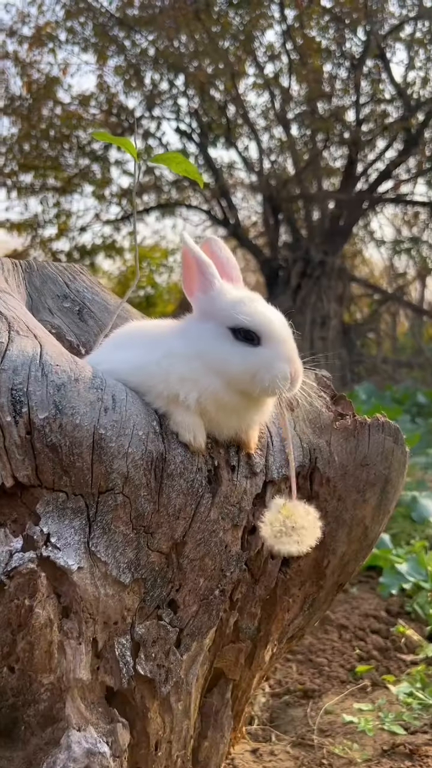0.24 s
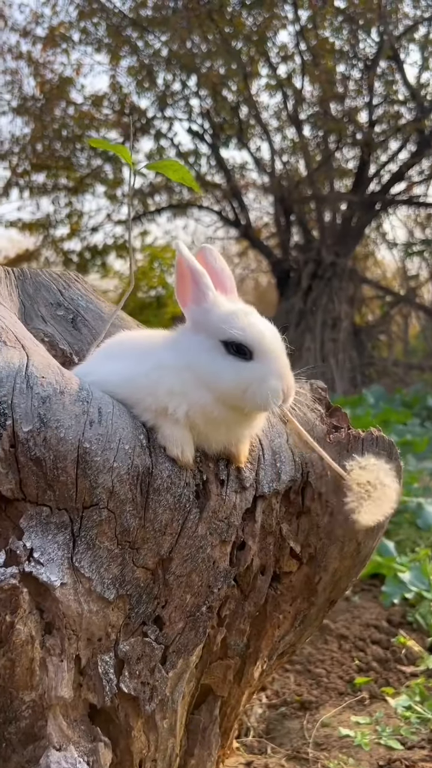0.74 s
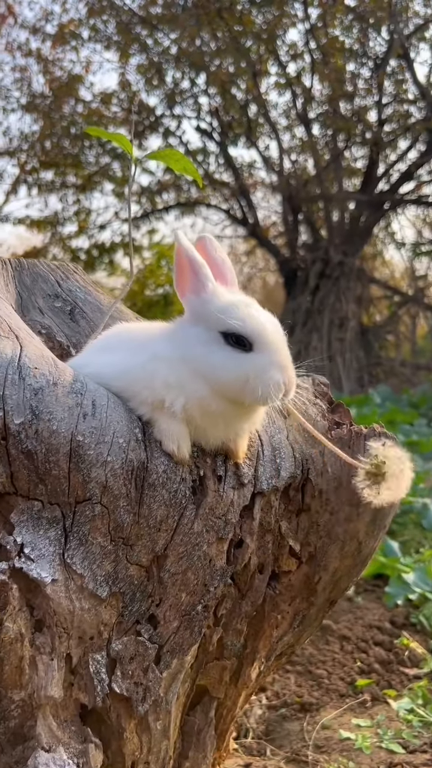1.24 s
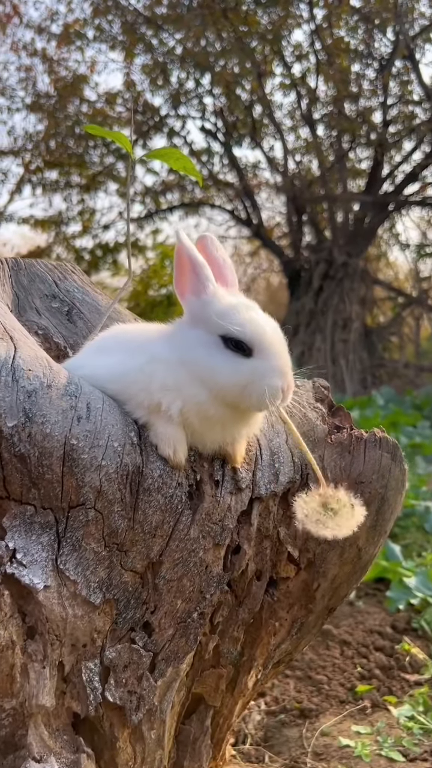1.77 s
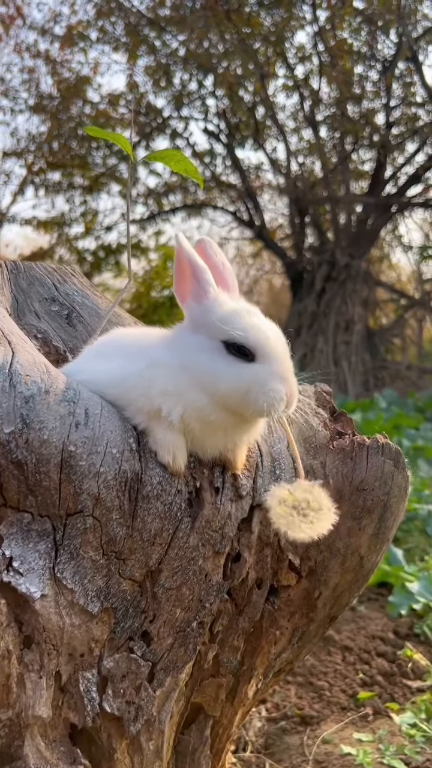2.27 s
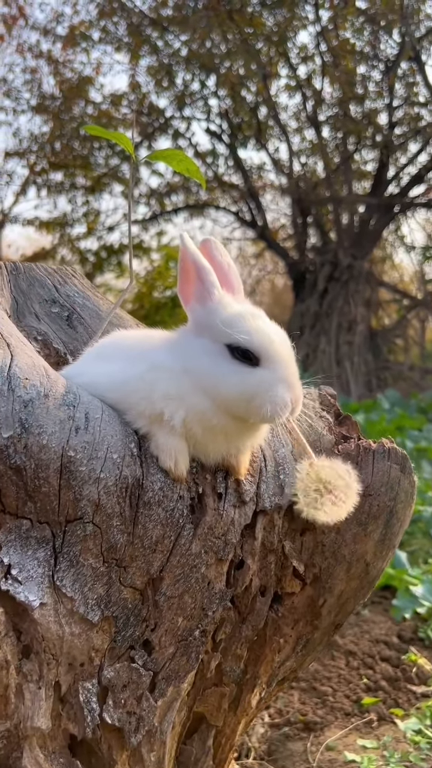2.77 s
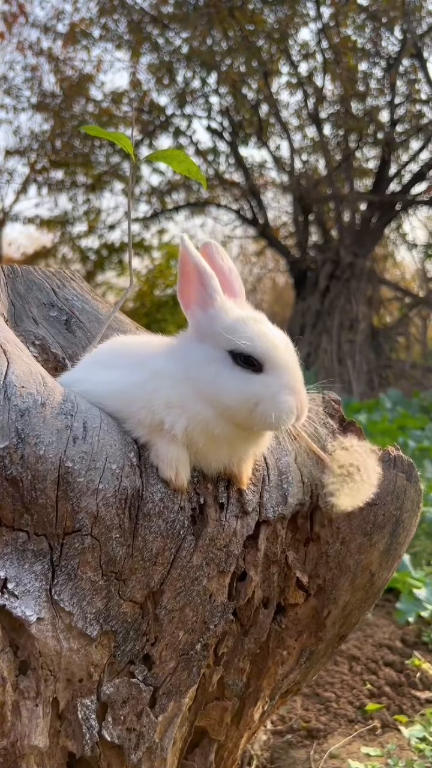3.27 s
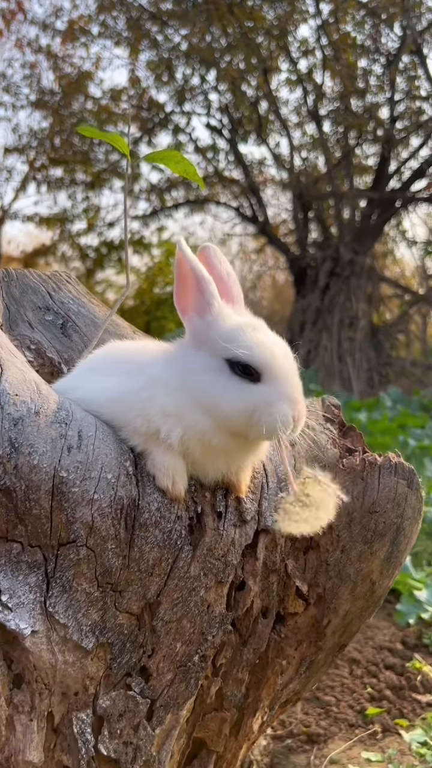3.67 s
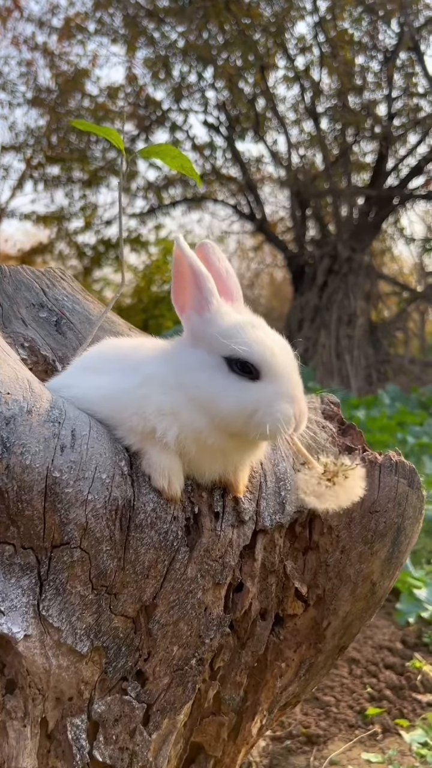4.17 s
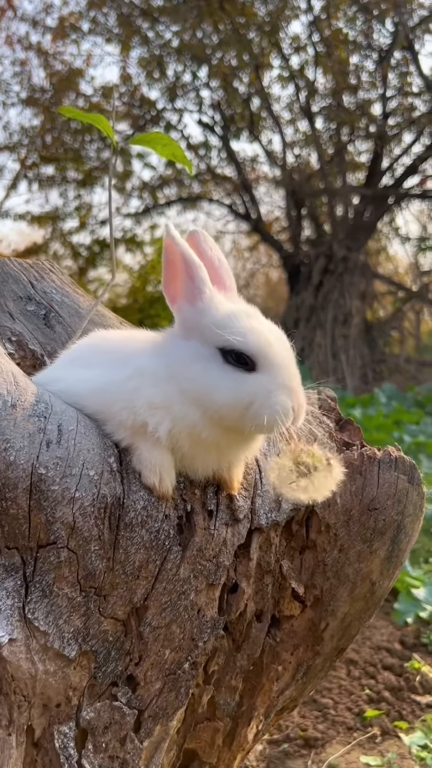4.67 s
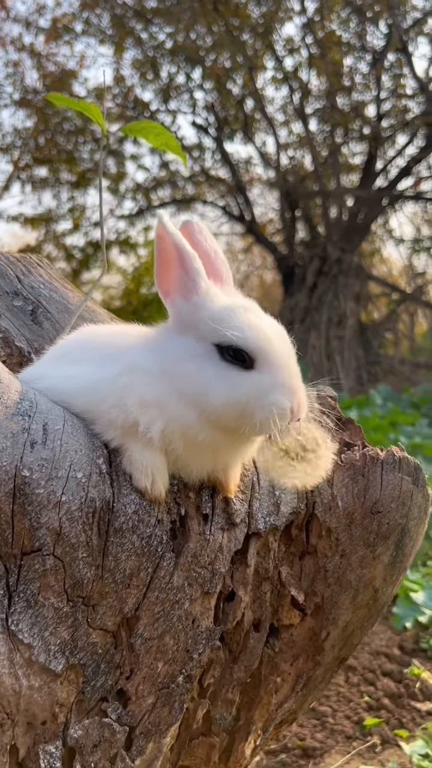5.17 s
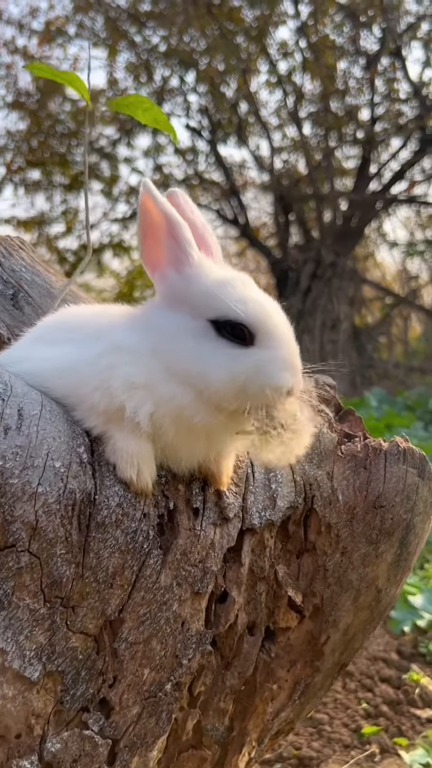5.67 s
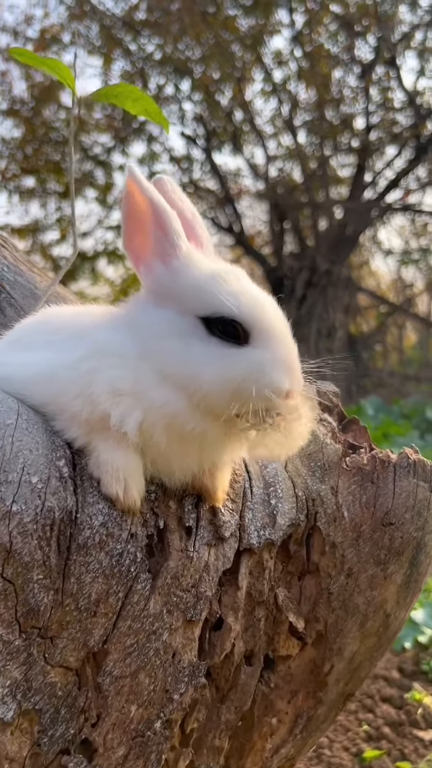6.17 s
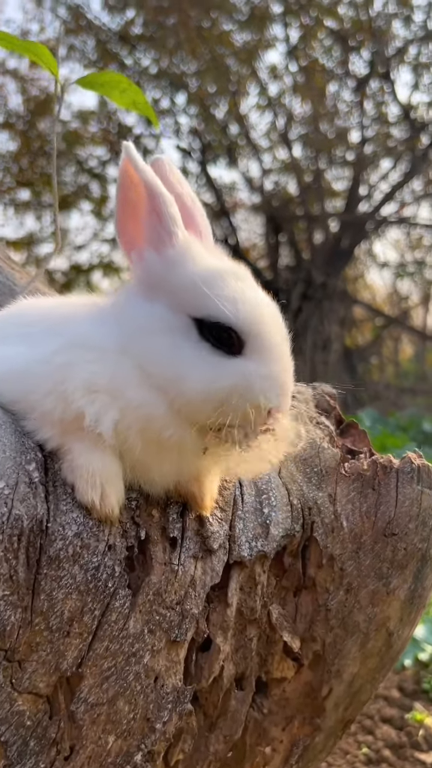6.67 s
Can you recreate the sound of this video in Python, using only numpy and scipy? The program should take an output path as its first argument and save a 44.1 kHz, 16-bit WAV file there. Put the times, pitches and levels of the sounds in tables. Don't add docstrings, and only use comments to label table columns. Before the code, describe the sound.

A small rabbit munches a dry stalk close up, crackling and snapping rapidly, while distant engines hum low underneath and one nears last.

```python
import sys
import numpy as np
from scipy import signal
from scipy.fft import rfft, irfft, next_fast_len
from scipy.io import wavfile
from scipy.ndimage import uniform_filter1d

SR = 44100
rng = np.random.default_rng(int(sys.argv[2]) if len(sys.argv) > 2 else 0)


def int16_out(signal):
    q = np.round(np.clip(np.atleast_2d(signal).T, -1, 1) * 32767)
    wavfile.write(sys.argv[1], SR, q.astype(np.int16))


def invert_db(level):
    return 10 ** (np.asarray(level, dtype=float) / 20)


N = 305362
SIZE = next_fast_len(N + 4096)
HZ = np.fft.rfftfreq(SIZE, 1 / SR)
TIME = np.arange(N) / SR

# [t/s, drone f/Hz, drone level/dB, roar level/dB]
TRAFFIC = [(0.0, 54, -43, -40), (0.25, 61.03, -31.5, -35), (0.6, 66.7, -32.5, -41.5),
           (0.85, 67.53, -31, -37.5), (1.5, 63.9, -35.5, -43.5), (1.73, 67.6, -31.5, -41.5),
           (2.75, 67.87, -39.5, -39.5), (3.12, 61.6, -36, -48.5), (3.7, 68.7, -37, -41),
           (3.91, 59.54, -40.5, -47.5), (4.35, 66.44, -34.5, -45), (4.59, 56.34, -24.5, -35.5),
           (5.01, 58.34, -31, -45.5), (5.389, 62.1, -42.5, -47), (5.82, 66.72, -27.5, -44.5),
           (6.15, 64.57, -33, -50.5), (6.4, 70.6, -28, -44.5), (6.92, 71.3, -15.5, -37.5)]
# [f/Hz, level/dB per Hz]
ROAR_COLOUR = [(15, -44), (25, 0), (49, -5.5), (76, 0.5), (151, -11.5), (200, -11.5), (395, -25),
               (700, -34.5), (910, -34), (1540, -120)]
# [f/Hz, likeness 0 to 1]
ROAR_LIKENESS = [(60, 1), (140, 0.98), (210, 0.91), (330, 0.35), (500, 0.059)]
# [f/Hz, level/dB per Hz]
SUM_COLOUR = [(150, -24), (400, -16.5), (1400, -10.5), (2200, -14.5), (3400, -11), (4700, -9), (5900, -15),
              (9300, -17), (10000, -8.5), (11500, -10.5), (14600, -19), (15700, -22.5), (16500, -65)]
# [f/Hz, level/dB per Hz]
DIFFERENCE_COLOUR = [(250, -29), (700, -14), (1800, -24), (2900, -17), (3800, -22), (5600, -1), (7100, -2),
                     (9300, -1), (10200, -28), (11800, -5), (14700, -11.5), (15800, -10), (16500, -63)]
# [t/s, peak level/dB, f/Hz]
KNOCKS = [(0.175, -37, 1470), (0.321, -22.5, 1250), (0.476, -26.5, 1410), (0.526, -28, 1300),
          (0.713, -31, 730), (0.852, -33, 1190), (2.166, -33, 367), (2.816, -22, 1670), (3.017, -32, 1500),
          (3.488, -23.5, 1530), (4.531, -33, 523.4), (5.163, -26, 418), (5.185, -33, 1737),
          (6.419, -38, 1340), (6.606, -24.5, 1470), (6.795, -27, 1280)]
# [t/s, peak level/dB, fizz level/dB over the middle band]
CRACKS = [(0.157, -25, -1), (0.1743, -13, -21), (0.3232, -16, -14), (0.4776, -14, -3.5), (0.713, -15.5, 5),
          (1.0291, -16, -3), (1.05, -10.5, 5), (1.4702, -15, -1), (1.8172, -14, -10), (1.983, -16, -20),
          (2.1378, -13.5, -5), (2.302, -3.5, -14), (2.5347, -15.5, 4.5), (3.0025, -15, -21),
          (3.349, -13.5, -11), (3.37, -19, -8), (3.4886, -25, -19), (3.8699, -8, -14), (4.2734, -9, -10),
          (4.2821, -14.5, -10), (4.447, -24, -13), (4.6052, -12, -12), (4.7636, -5, -10), (4.7789, -10, -6),
          (4.9418, -12.5, 0), (5.1473, -22, -21), (5.72, -18, -17), (6.4052, -20, -13), (6.588, -15, -4),
          (6.806, -23, -1)]
# [t/s, peak level/dB, fizz level/dB over the middle band]
SNAPS = [(0.114, -3.5, 0), (0.849, -11.5, 2.5), (0.854, -21, 0), (1.2302, -18, -3), (1.2896, -23, -6),
         (1.4808, -10.5, -3), (1.4984, -16, 3), (1.7977, -25, -5), (1.958, -13, -2), (1.968, -4.5, -20),
         (2.134, -2.5, -9), (2.32, -6.5, -12), (2.675, -6.5, -11), (2.8353, -16, 0), (3.1749, -7, -21),
         (3.182, -13, -7), (3.3555, -13, 0), (3.3603, -5, -29), (3.4012, -18.5, 6), (3.5817, -14, 3.5),
         (3.9148, -8, -3.5), (4.0611, -15, -2), (4.0953, -21.5, 9), (4.243, -13, -4), (4.975, -14.5, -9),
         (5.5297, -8, -21), (5.5523, -5.5, -9), (5.654, -21, -6), (5.8684, -6, -8), (6.0455, -17, 8)]
# [t/s, peak level/dB, fizz level/dB over the middle band]
TICKS = [(1.0359, -10.4, -1), (1.085, -14.5, -0.5), (1.2436, -15, 1), (1.2642, -10.5, -3),
         (1.43, -17.5, -1), (1.6202, -6.5, -4.5), (2.1601, -7, -12), (2.6851, -6.5, -4), (2.8197, 1, -34),
         (2.8595, -11, -6), (3.0549, -12.5, 9), (3.503, -8, -30), (3.507, 2, -31), (3.521, -14, -22),
         (3.6893, -15, -11), (3.7003, -12, -11), (3.747, -14, 0), (4.0498, -5.5, -16), (4.2345, -6, -6),
         (4.261, -10.5, -1), (4.409, -13, -5), (4.8115, -11.5, -4), (5.1263, -11, -12), (5.3463, -4, -36),
         (5.3557, 0, -19), (5.7, -9.5, -16), (6.057, -6, -6.5), (6.399, -11.5, -3), (6.4157, -10, -7),
         (6.578, -17, 2)]
# [t/s, rustle level/dB]
GAPS = [(0.0, -35), (0.27, -50.5), (0.41, -39.5), (0.7, -44.5), (0.96, -38), (1.2, -44), (1.6, -41.5),
        (2.07, -37.5), (2.7, -38), (3.31, -45), (3.5, -37.5), (4.17, -41.5), (4.54, -35.5), (5.27, -44.5),
        (5.8, -39), (6.17, -49.5), (6.35, -40), (6.92, -43.5)]
# [t/s, length/s, grind start level/dB, grind end level/dB, skull thud level/dB over grind]
LONG_STALK = [(0.0, 0.028, -32, -33.5, -8.5), (0.115, 0.049, -23, -20.5, -9), (0.296, 0.03, -40, -23.5, -7),
              (0.46, 0.068, -34, -31.5, -3.5), (0.638, 0.063, -36, -29, -8.5),
              (0.828, 0.06, -29.5, -22.5, -7.5), (1.024, 0.082, -23.5, -33.5, -5),
              (1.223, 0.04, -23.5, -19.5, -13), (1.42, 0.059, -28.5, -19.5, -9),
              (1.606, 0.056, -25, -24.5, -9.5), (1.797, 0.02, -29.5, -25, -6.5),
              (1.951, 0.029, -27, -18.5, -10.5), (2.11, 0.11, -34, -34, -4.5),
              (2.303, 0.02, -15, -19, -13.5)]
# [t/s, length/s, level/dB, level/dB, level/dB]
SHORT_STALK = [(2.498, 0.046, -22, -30, -10.5), (2.66, 0.051, -21, -23.5, -11),
               (2.816, 0.048, -18, -25.5, -15.5), (2.994, 0.065, -17.5, -23.5, -12),
               (3.174, 0.083, -27.5, -33.5, -17), (3.352, 0.024, -22.5, -21, -19.5),
               (3.504, 0.074, -16, -30, -15.5), (3.703, 0.065, -15, -24.5, -15.5),
               (3.869, 0.012, -9.5, -28, -19.5), (4.055, 0.04, -21.5, -23, -16),
               (4.225, 0.052, -21.5, -20, -16.5), (4.403, 0.068, -21, -26, -13),
               (4.579, 0.045, -24, -22, -12.5), (4.758, 0.054, -19, -29, -14.5),
               (4.921, 0.084, -31.5, -37, -15.5)]
# [t/s, length/s, level/dB, level/dB, level/dB]
SEED_HEAD = [(5.12, 0.048, -31, -26, -6), (5.349, 0.011, -20.5, -22, -15.5),
             (5.533, 0.022, -17, -32.5, -15.5), (5.686, 0.035, -34.5, -30, -6),
             (5.863, 0.01, -25.5, -24.5, -9.5), (6.034, 0.013, -23, -25, -11),
             (6.205, 0.047, -32.5, -29.5, -8), (6.381, 0.05, -41, -30.5, -5),
             (6.571, 0.025, -33, -24.5, -4.5), (6.779, 0.053, -33.5, -40.5, -1.5),
             (6.888, 0.04, -47.5, -43, -2)]
# [t/s, length/s]
FULL_STEREO = [(0.109, 0.054), (0.71, 0.086), (1.026, 0.017), (1.069, 0.044), (1.16, 0.052), (1.233, 0.063),
               (1.41, 0.12), (1.625, 0.055), (1.952, 0.063), (2.23, 0.021), (2.272, 0.041), (2.81, 0.091),
               (3.037, 0.077), (3.172, 0.034), (3.621, 0.08), (3.738, 0.04), (4.085, 0.021), (4.2, 0.034),
               (4.393, 0.056), (4.505, 0.075), (4.755, 0.088), (4.932, 0.078), (5.107, 0.04),
               (5.219, 0.076), (5.644, 0.027), (5.691, 0.015), (5.85, 0.07), (6.031, 0.037), (6.393, 0.041),
               (6.776, 0.052)]


def evened(x):
    return x / np.sqrt(np.mean(abs(x) ** 2) + 1e-20)


def drifting(shape, *sizes):
    field = rng.standard_normal(shape)
    for axis, size in enumerate(sizes):
        field = uniform_filter1d(field, size=size, axis=axis)
    return evened(field)


def read(points):
    f, value = np.transpose(points)
    return np.interp(np.log(HZ + 1), np.log(f + 1), value)


def causal(db):
    cepstrum = irfft(db * np.log(10) / 20, SIZE)
    cepstrum[1:SIZE // 2] *= 2
    cepstrum[SIZE // 2 + 1:] = 0
    return np.exp(rfft(cepstrum))


def shaped(x, response):
    return irfft(rfft(x, SIZE) * response, SIZE)[..., :N]


def ports(low, middle, fizz):
    colour = np.array([causal(read(SUM_COLOUR)), causal(read(DIFFERENCE_COLOUR))])
    above_low, above_middle = [1 / (1 + (edge_hz / (HZ + 1)) ** 12) for edge_hz in (2784, 9260)]
    bands = 1 - above_low, above_low - above_middle, above_middle
    mid, side = sum(shaped(x, evened(colour * band) / np.sqrt(2))
                    for x, band in zip((low, middle, fizz), bands))
    return np.array([mid + side, mid - side])


def traffic():
    t, *columns = np.transpose(TRAFFIC)
    drone_hz, drone_db, roar_db = (np.interp(TIME, t, column) for column in columns)
    lumps, sway, gusts = drifting(N, 900), drifting(N, 1500), drifting(N, 4000)

    lumpy_db = np.clip(-0.15 * (drone_db + 14), 0, 4)
    drone_turns = np.cumsum(drone_hz * (1 + 0.0294 * sway)) / SR
    drone = invert_db(drone_db + 1.5 + lumpy_db * lumps) * np.sin(2 * np.pi * drone_turns)
    whine_turns = np.cumsum(191.1 * (1 + 0.0322 * lumps)) / SR
    whine = invert_db(roar_db - 5.5 + 1.3 * sway) * np.sin(2 * np.pi * whine_turns)

    a, b = rfft(rng.standard_normal((2, SIZE)))
    same = np.clip(read(ROAR_LIKENESS), 0, 1)
    pair = np.array([a, same * a + np.sqrt(1 - same ** 2) * b]) * invert_db(read(ROAR_COLOUR))
    roar = evened(irfft(pair, SIZE)[:, :N]) * invert_db(roar_db + 9.5 + 3.1 * gusts)
    roar = shaped(roar, 1 / (1 + (32 / (HZ + 1)) ** 4))
    return shaped(drone + whine, HZ < 400) + roar * invert_db([[-0.8], [0.8]])


def knocks():
    ring_s = 0.0011
    out, t = np.zeros(N + 2048), np.arange(2048) / SR
    swell = t / ring_s * np.exp(-t / ring_s)
    for s, db, hz in KNOCKS:
        at = round(s * SR)
        out[at:at + len(t)] += invert_db(db + 14) * swell * np.sin(2 * np.pi * hz * t)
    return out[:N] * np.array([[1.15], [0.85]])


def breaks():
    kinds = (CRACKS, -8), (SNAPS, -12.5), (TICKS, -22.5)
    return [(s, db, low_db, fizz_db) for kind, low_db in kinds for s, db, fizz_db in kind]


def snaps():
    ring_s = np.array([0.00083, 0.00036, 0.00036])
    length = 320
    t = np.arange(length) / SR / ring_s[:, None, None]
    drive = np.zeros((3, 2, N + length))
    flurries = rng.standard_normal((len(breaks()), 1, 2, length)) * t * np.exp(-t)
    flurries *= np.sqrt(30) / np.linalg.norm(flurries, axis=3, keepdims=True)
    for (s, db, low_db, fizz_db), flurry in zip(breaks(), flurries):
        at = round(s * SR) - 16
        bands = invert_db(0.5 + db + np.array([low_db - 4.5, -1.5, fizz_db - 2]))
        drive[:, :, at:at + length] += bands[:, None, None] * flurry
    return ports(*drive[..., :N])


def chews():
    parts = (LONG_STALK, -6.5), (SHORT_STALK, -6), (SEED_HEAD, -4)
    return [(*row, fizz_db - 0.1 * (max(row[2:4]) + 26))
            for part, fizz_db in parts for row in part]


def strokes(rise_db_s, fall_db_s, column):
    time = TIME[::16]
    power = np.zeros(len(time))
    for s, length, start_db, end_db, thud_db, fizz_db in chews():
        over_db = (0, thud_db, fizz_db)[column]
        end = s + length
        level_db = np.interp(time, [s, end], [start_db, end_db]) + over_db
        level_db -= rise_db_s * np.maximum(s - time, 0) + fall_db_s * np.maximum(time - s - length, 0)
        settling_db = end_db + over_db - 16 - 90 * abs(time - end)
        power += invert_db(2 * level_db) + invert_db(2 * settling_db) * (time > end)
    return np.interp(TIME, time, power)


def crackle(per_s, spread_db, smooth):
    clumps = invert_db(2.8 * drifting(N, 180))
    size = invert_db(spread_db * np.minimum(rng.exponential(1, N), 3.5))
    size = size * (rng.random(N) < per_s / SR)
    return evened(clumps * (evened(size) + smooth) * rng.standard_normal((2, N)))


def mouthed(x, patchy_db):
    z = signal.stft(x, nperseg=256)[2]
    patches = invert_db(patchy_db * drifting(z.shape[1:], 3, 11))
    return signal.istft(z * evened(patches), nperseg=256)[1][:, :N]


def grind():
    rustle_db = np.interp(TIME, *np.transpose(GAPS))
    rustle = invert_db(rustle_db + 1.5 * drifting(N, 4000)) * rng.standard_normal((2, N))
    murmur = invert_db(rustle_db - 9.5 + 2.7 * drifting(N, 4000)) * rng.standard_normal((2, N))
    grains = crackle(2500, 2.4, 1.5)
    fine = crackle(3500, 2.0, 2.0)
    dull = crackle(700, 2.6, 1.4)
    low = np.sqrt(strokes(910, 280, column=1)) * dull + murmur
    middle = np.sqrt(strokes(1300, 550, column=0)) * invert_db(-1.7) * grains + rustle
    fizz = np.sqrt(strokes(1700, 540, column=2)) * fine + rustle * invert_db(-6.5)
    return mouthed(ports(low, middle, fizz), patchy_db=2.5)


def scene():
    return traffic() + knocks() + snaps() + grind()


def thinned(x):
    under_db, waver_db, faint_db, top_hz = 7.0, 1.8, -62, 15800
    sharp_db, sharp_s = -7, 0.009
    hz, t, z = signal.stft([x[0] + x[1], x[0] - x[1]], SR, nperseg=1024, noverlap=768)
    starts = np.arange(0, 513, 8)
    band_hz = hz[starts, None]
    power = np.add.reduceat(abs(z) ** 2, starts, axis=1)
    level_db = 10 * np.log10(uniform_filter1d(power, size=10, axis=2) + 1e-20)

    full = sum((t > s) & (t < s + length) for s, length in FULL_STEREO) > 0
    full |= sum(abs(t - s) < sharp_s for s, db, *_ in breaks() if db > sharp_db) > 0
    waver = waver_db * drifting(power.shape[1:], 2, 8)
    strong = level_db - level_db[::-1] + abs(waver) > -under_db
    kept = strong | full | (band_hz < 1300)
    floor_db = faint_db - np.array([0, 5])[:, None, None]
    kept &= (level_db + 2 * waver > floor_db) | (band_hz < 11500)
    kept = kept[:, np.arange(513) // 8] & (hz[:, None] < top_hz + 600 * full)
    mid, side = signal.istft(z * kept, nperseg=1024, noverlap=768)[1][:, :N] / 2
    return np.array([mid + side, mid - side])


def roll_off(x):
    return signal.sosfilt(signal.butter(12, 16530, fs=SR, output="sos"), x)


def record(dry):
    squeezed = np.tanh(dry * 0.85) / 0.97
    return roll_off(thinned(squeezed))


dry = scene()
out = record(dry)
int16_out(out)
```